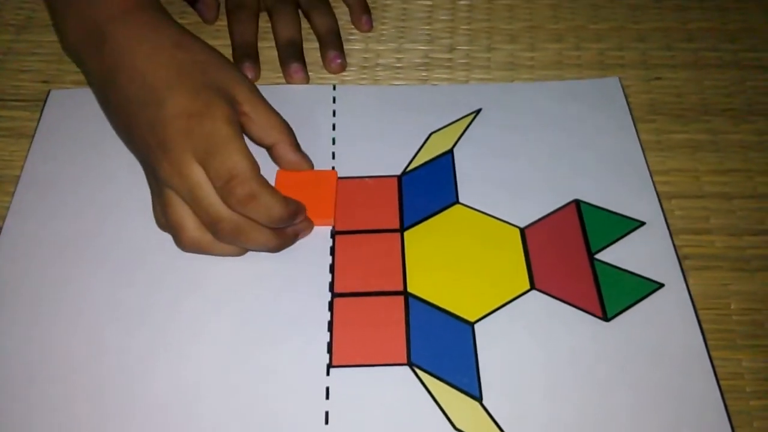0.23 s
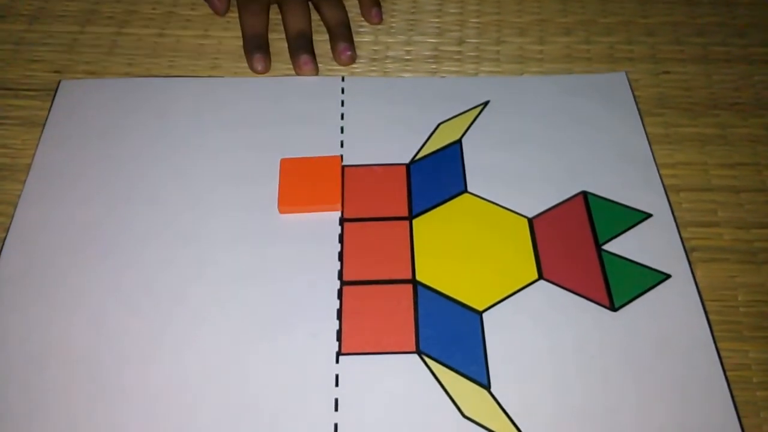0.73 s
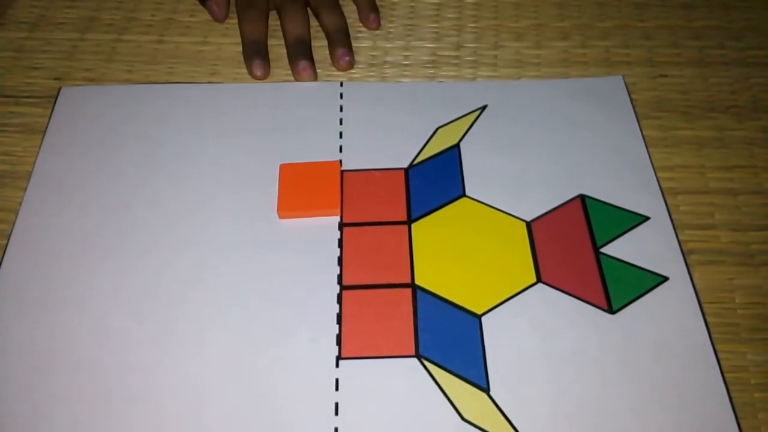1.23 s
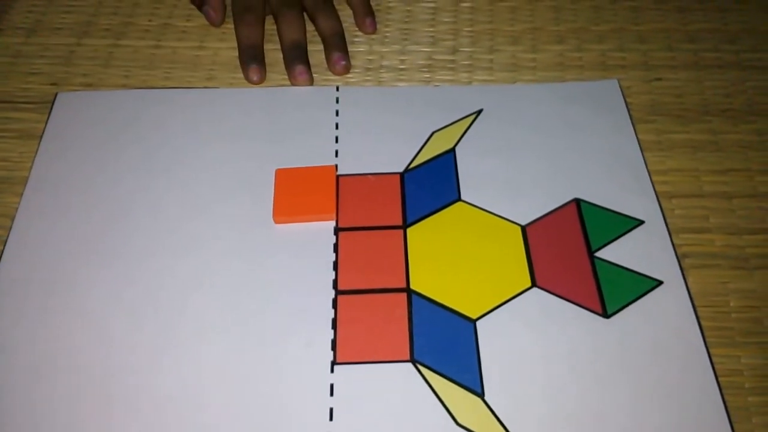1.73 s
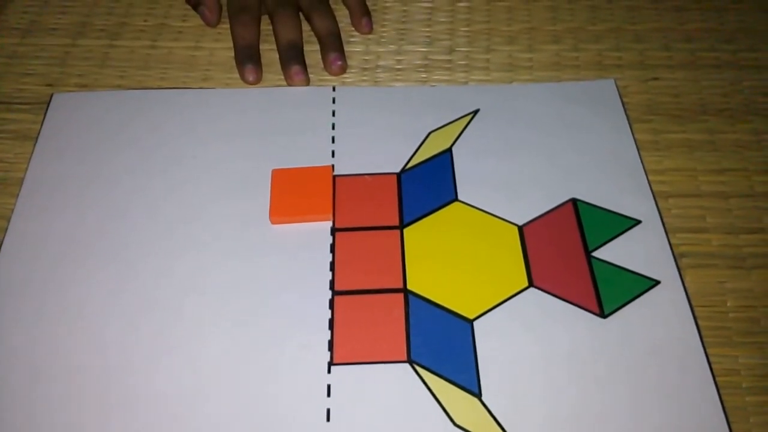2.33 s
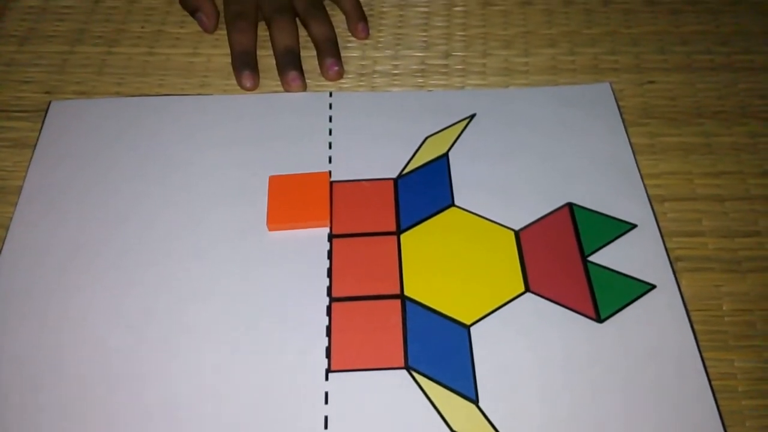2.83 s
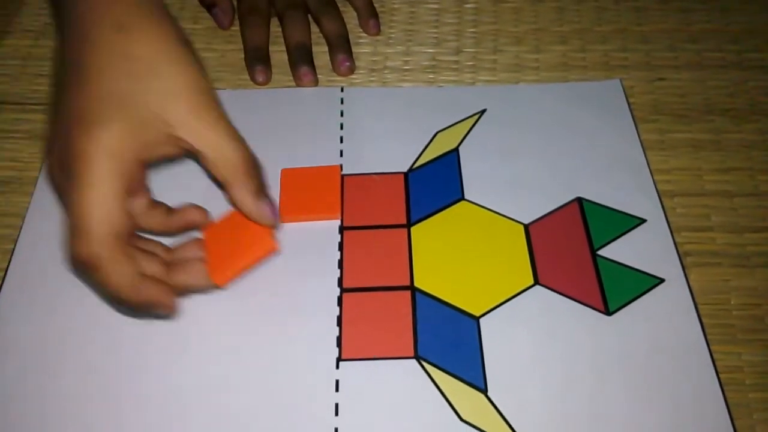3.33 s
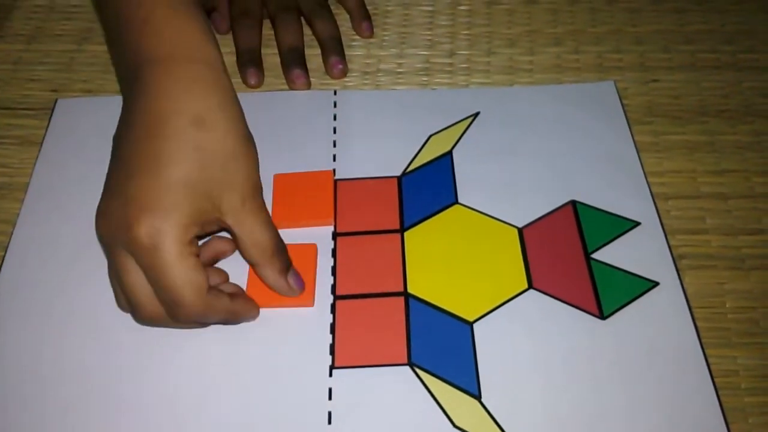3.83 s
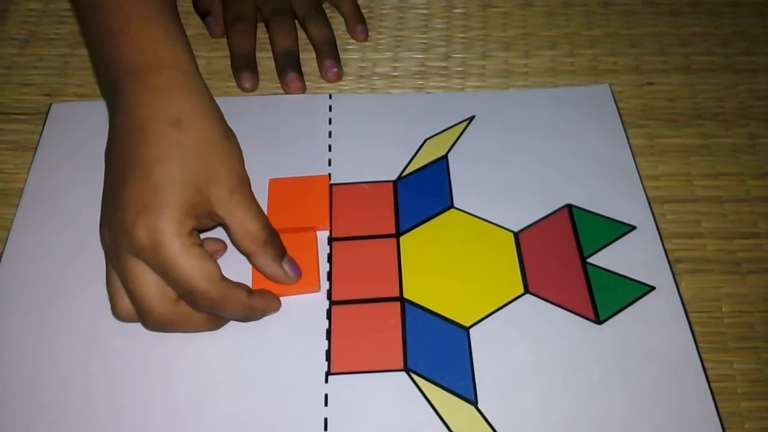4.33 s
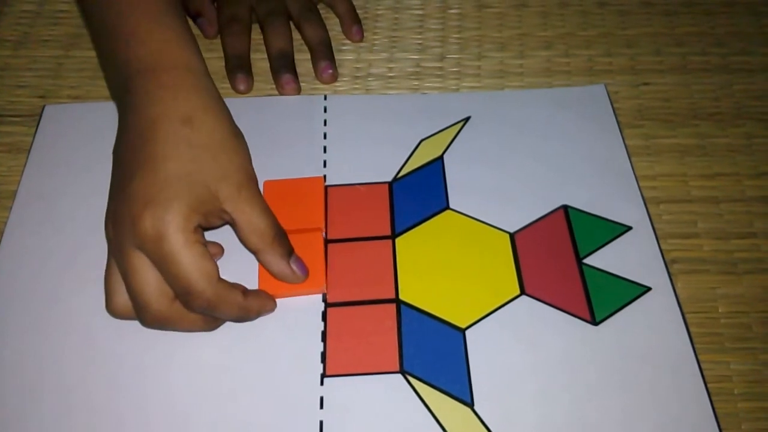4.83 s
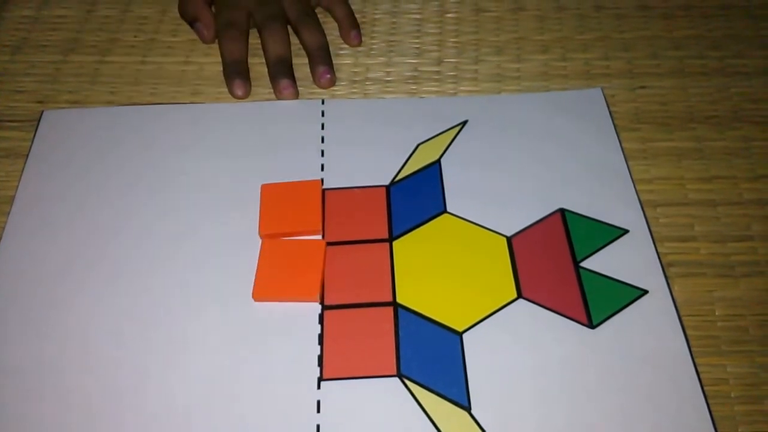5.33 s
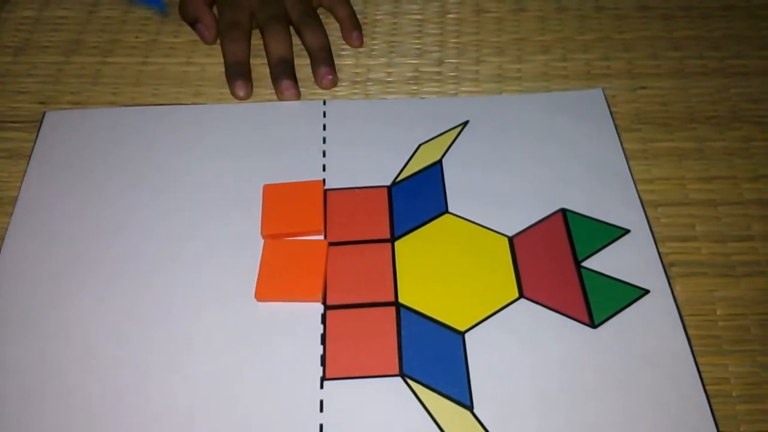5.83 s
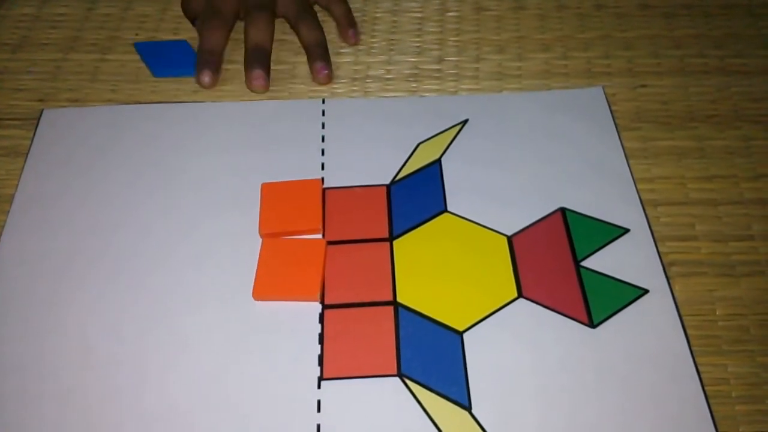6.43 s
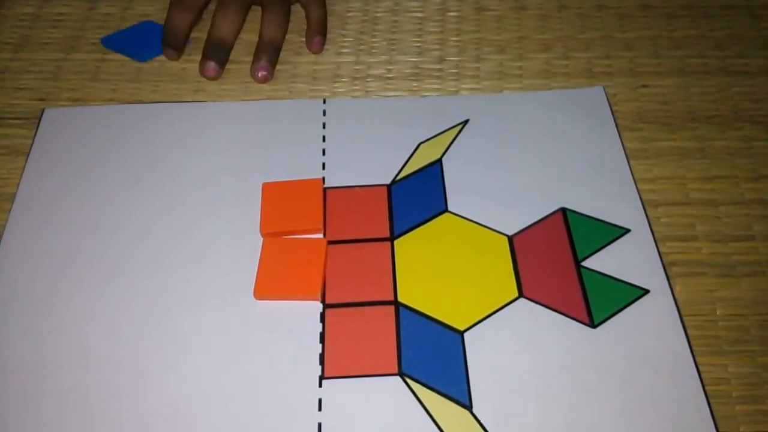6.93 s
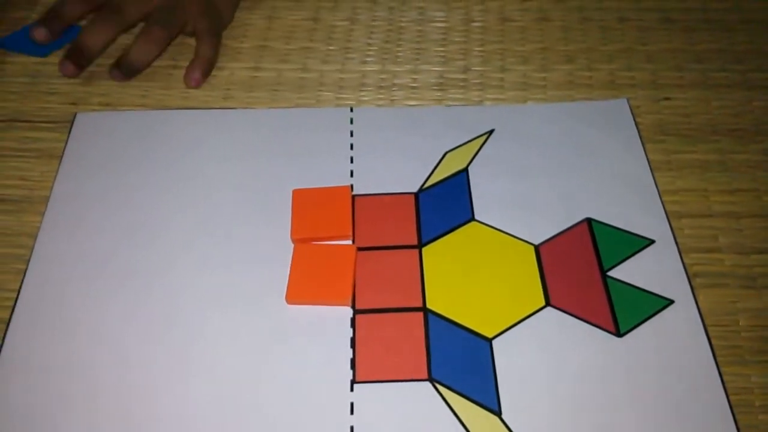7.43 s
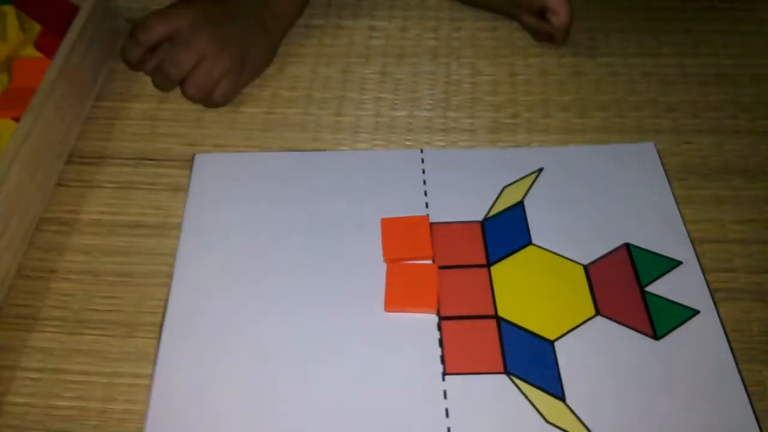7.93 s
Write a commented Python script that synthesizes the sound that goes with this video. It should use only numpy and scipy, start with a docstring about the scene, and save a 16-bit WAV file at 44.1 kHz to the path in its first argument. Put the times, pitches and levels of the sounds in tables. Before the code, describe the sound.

After a nearly silent start with a dull far-off thud, wooden blocks clack, rattle and scrape inside a box for about two seconds. A hush follows, with only low rumble, small taps of one block on a laminated sheet and barely audible nudging. Then a second rummage starts with a very hard clack and continues in irregular rattles. Close pickup, short hard room reflections, faint hiss.

```python
"""Wooden blocks in a box

A child rummages in a wooden box of small flat blocks, sets one down on a laminated sheet, slides it
into place and rummages again. Contacts are decaying sines plus filtered noise bursts; scrapes are
random slips turned into filtered rattle. Noise tails give the small bare room. From far away come a
dull thud (filtered noise) and a faint whine (wavering sines), over low rumble and hiss."""
import sys
import numpy as np
from scipy import signal
from scipy.fft import rfft, irfft, next_fast_len
from scipy.io import wavfile
from scipy.ndimage import uniform_filter1d, map_coordinates

SR = 44100
rng = np.random.default_rng(int(sys.argv[2]) if len(sys.argv) > 2 else 0)


def dump(signal):
    """Clip the signal to [-1, 1] and save it as 16-bit WAV at the path in sys.argv[1]."""
    limited = np.clip(np.atleast_2d(signal).T, -1, 1)
    pcm = np.round(limited * 32767).astype(np.int16)
    wavfile.write(sys.argv[1], SR, pcm)


N = 360738
HIT_SAMPLES = 1536  # length of one hit

# outstanding blows, levels before trims, rms over 5 ms:
# [t/s, box knock/dB, block click/dB, block pitch f/Hz, edge snap/dB]
BLOWS = [(0.8491, -24.5, -9.5, 6615, -25.5), (0.8529, -13, -17.5, 2893, -36),
         (0.8613, -20.5, -11, 3601, -27.5), (.928, -23, -22.5, 2678, -31), (1.061, -34, -22.5, 4100, -40.5),
         (1.0716, -23, -13, 4420, -33.5), (1.0932, -21, -15, 5070, -31), (1.1772, -29.5, -37.5, 2915, -54),
         (1.2443, -26, -26.5, 4237, -56), (1.2611, -23.5, -31, 5080, -40), (1.351, -30.5, -17, 2950, -32.5),
         (1.4097, -30.5, -20, 5560, -40), (1.4482, -21.5, -15.5, 4765, -38),
         (1.4614, -24, -19, 6650, -31.5), (1.5192, -23.5, -14.5, 5220, -44),
         (1.5539, -30.5, -20, 3464, -34.5), (1.5798, -28.5, -24, 4800, -50),
         (1.6327, -27.5, -11, 5555, -29), (1.6473, -27.5, -22, 4560, -29.5),
         (1.8997, -43.5, -28, 6550, -36), (1.9236, -34, -24.5, 3560, -44.5),
         (1.9753, -43, -30, 2990, -53.5), (2.0865, -39, -30, 6400, -39.5),
         (2.1063, -37.5, -35, 5060, -54.5), (2.251, -21.5, -22.5, 2850, -41.5),
         (2.2962, -26, -32.5, 4350, -54), (2.3662, -29.5, -27.5, 7030, -33),
         (2.4014, -29, -25, 6400, -38.5), (2.5138, -27.5, -36.5, 2370, -63),
         (2.5745, -33, -31.5, 2920, -49), (2.8264, -39.5, -35.5, 3630, -77),
         (2.9531, -27.5, -28, 6550, -48), (5.404, -22, -26.5, 5170, -57.5),
         (5.4183, -33.5, -20, 6380, -27.5), (5.4219, -17.5, -37.5, 3640, -38),
         (5.4346, -30.5, -20.5, 5550, -33.5), (5.4651, -28, -25.5, 4170, -32.5),
         (5.5094, -16, -23, 2328, -54.5), (5.5365, -12, -10.5, 2776, -25.5), (5.5413, -10, -6, 2780, -24.5),
         (5.5594, -27, -11, 4060, -25), (5.5856, -17, -22.5, 5300, -36), (5.5988, -21.5, -18, 2560, -40.5),
         (5.6123, -28, -19.5, 3430, -33.5), (5.6243, -18, -30, 2290, -33), (5.729, -21.5, -21, 4770, -35.5),
         (5.752, -24, -23, 2934, -31), (5.7847, -22, -13.5, 6660, -22.5), (5.9663, -36.5, -49.5, 2970, -71),
         (5.9898, -27.5, -35, 4960, -41), (6.0491, -35.5, -49, 2820, -60),
         (6.1068, -28.5, -25.5, 6900, -46), (6.1304, -26, -23, 4630, -41), (6.211, -21, -16.5, 6290, -32),
         (6.3108, -24.5, -12.5, 6430, -23), (6.3646, -24, -19, 2835, -39),
         (6.3869, -22.5, -11, 5140, -30.5), (6.4362, -25, -18.5, 3944, -44),
         (6.4791, -50.5, -22.5, 7130, -39), (6.5261, -32, -24, 4920, -47.5),
         (6.5537, -26, -20.5, 6570, -34.5), (6.6351, -47, -32.5, 4440, -67),
         (6.6562, -29.5, -26.5, 4810, -39.5), (6.7398, -31, -45, 3010, -74),
         (7.035, -33.5, -32, 4630, -51.5), (7.1281, -28, -14, 4680, -23.5), (7.1456, -23, -21, 5300, -37.5),
         (7.1806, -32.5, -16, 5190, -31), (7.3701, -31.5, -28.5, 4845, -57),
         (7.4082, -34.5, -26, 3570, -45.5), (7.4532, -30, -26, 3470, -53), (7.4758, -26, -21, 3703, -48),
         (7.5952, -28, -33, 3200, -67), (7.631, -45.5, -31.5, 3880, -52), (7.6596, -26.5, -23.5, 5110, -70),
         (7.7866, -29, -28.5, 2920, -47), (7.8059, -20.5, -21, 2840, -35), (7.8171, -23, -32, 5020, -38.5),
         (7.8665, -34, -35.5, 6170, -49), (7.9289, -20.5, -18.5, 3500, -43.5)]
# pushes of blocks over the box bottom: [middle t/s, half length/s, level/dB before trims]
PUSHES = [(.95, .04, -34), (1.066, 0.03, -30.5), (1.23, .04, -42.5), (1.409, 0.049, -31), (1.6, .05, -37.5),
          (1.733, 0.025, -39), (1.921, .025, -35.5), (2.101, .03, -46), (2.387, .08, -36.5),
          (2.691, 0.016, -46), (2.762, .02, -58.5), (2.862, 0.044, -48.5), (5.47, .035, -33.5),
          (5.76, 0.066, -31), (6.091, 0.11, -39), (6.418, .11, -37.5), (6.7, .07, -47), (6.921, .11, -52),
          (7.17, .029, -37), (7.458, .095, -35), (7.83, .03, -41.5), (8.137, 0.039, -56)]
# relative spectrum of knocks on the box: [f/Hz, density/dB per Hz]
KNOCK_SPECTRUM = [(60, -28), (350, -24.5), (600, -14.5), (860, -8), (1120, -0.5), (2400, 3), (3200, -6),
                  (6000, -41.5)]
# relative spectrum of scrape hiss and grazing clicks: [f/Hz, density/dB per Hz]
HISS_SPECTRUM = [(1000, -22.5), (2700, 8), (4000, -1.5), (6700, -2.5), (7700, -15.5), (11000, -25),
                 (15500, -31.5)]
# relative spectrum of a tap on the sheet or between blocks: [f/Hz, density/dB per Hz]
TAP_SPECTRUM = [(200, -24), (1100, -20), (1700, 0), (2300, -0.5), (3400, -6), (6700, -13), (7800, -25),
                (14000, -45.5)]


def amp(db):
    """Decibels to gain."""
    return np.exp(np.asarray(db) * (np.log(10) / 20))


def unit(x):
    """Scale to rms 1."""
    return x / np.sqrt(np.mean(x ** 2) + 1e-20)


def along(points, hz):
    """Interpolate (f/Hz, value) points on a log frequency axis."""
    f, v = np.transpose(points)
    return np.interp(np.log(hz + 1), np.log(f), v)


def gains(rows):
    """One gain curve per dB column of (t/s, dB...) rows; -140 dB outside."""
    s, *columns = np.transpose(rows)
    t = np.arange(N) / SR
    return [amp(np.interp(t, s, db, left=-140, right=-140)) for db in columns]


def wobble(rate_hz):
    """Smooth random curve through normal knots at rate_hz."""
    knots = rng.standard_normal(int(N * rate_hz / SR) + 4)
    coarse = np.arange(0, N, 32)
    return np.interp(np.arange(N), coarse, map_coordinates(knots, [coarse * rate_hz / SR]))


def colour(x, points):
    """Minimum-phase filter with the given spectrum, via the folded cepstrum."""
    size = 2 * next_fast_len(x.shape[-1] // 2 + HIT_SAMPLES)
    cepstrum = irfft(np.log(amp(along(points, np.fft.rfftfreq(size, 1 / SR)))))
    cepstrum[1:size // 2] *= 2
    cepstrum[size // 2 + 1:] = 0
    response = np.exp(rfft(cepstrum))
    return irfft(rfft(x, size) * response)[..., :x.shape[-1]]


def fade(t, t60):
    """Exponential decay, -60 dB at t60."""
    return np.exp(-np.minimum(np.log(1000) * t / t60, 60))


def level(hits):
    """Scale each row to the energy of 5 ms at rms 1."""
    return hits * np.sqrt(0.005 * SR / (np.sum(hits ** 2, axis=-1, keepdims=True) + 1e-20))


def place(times, hits):
    """Add each row into the time line at its time."""
    index = np.round(times * SR).astype(int) + np.arange(hits.shape[1])
    return np.bincount(index.ravel(), hits.ravel(), N)[:N]


def bursts(count, t60, spectrum):
    """Short decaying noise cracks, one a row."""
    noise = rng.standard_normal((count, HIT_SAMPLES))
    return level(colour(noise * fade(np.arange(HIT_SAMPLES) / SR, t60), spectrum))


def scuff(count, spectrum, rise_s=0.0016):
    """Brief graze just before a blow: noise swelling exponentially, one a row."""
    t = np.arange(HIT_SAMPLES) / SR
    noise = rng.standard_normal((count, HIT_SAMPLES))
    return level(colour(noise * np.exp((t - t[-1]) / rise_s), spectrum))


def patchy(x, depth_db):
    """Let narrow bands of a noise swell and sink on their own."""
    z = signal.stft(x, nperseg=2048)[2]
    field = rng.standard_normal(z.shape[-2:])
    field = uniform_filter1d(field, size=3, axis=0)
    field = uniform_filter1d(field, size=8, axis=1)
    return signal.istft(z * amp(depth_db * unit(field)), nperseg=2048)[1][..., :N]


def strokes(rows):
    """Gain curve of (middle/s, half length/s, dB) strokes: bells with power 1/e at the half length."""
    middle, half, db = np.transpose(rows)[:, :, None]
    t = np.arange(0, N, 32) / SR
    power = amp(db) ** 2 * np.exp(-np.minimum(((t - middle) / half) ** 2, 60))
    return np.interp(np.arange(N) / SR, t, np.sqrt(power.sum(axis=0)))


def friction(rate_hz, spread_db, smooth_db):
    """Tiny slips of uneven size over a smooth rubbing noise, rms 1."""
    happens = rng.random(N) < rate_hz / SR
    sign = rng.choice([-1, 1], N)
    slips = happens * sign * amp(spread_db * np.clip(rng.standard_normal(N), -2, 2))
    return unit(unit(slips) + amp(smooth_db) * rng.standard_normal(N))


def background(deep_db=-2, upper_db=-2, air_db=-73, side_db=-15):
    """Wandering low rumble of the surroundings and faint hiss: patchy noise, slightly wide."""
    # rumble before trims: [t/s, deep level/dB, upper level/dB]
    rumble_rows = [(0, -59, -64), (.8, -55, -58), (1.8, -49, -58.5), (2.2, -55.5, -64.5), (3.7, -61, -61.5),
                   (4.2, -65, -66), (5.4, -58, -60), (6.5, -60, -65.5), (6.9, -59, -57), (8.18, -65, -65.5)]
    # relative spectra: [f/Hz, density/dB per Hz]
    deep_spectrum = [(20, -29), (48, -10.5), (68, 1), (90, -7.5), (128, 3), (160, -13), (300, -26.5),
                     (900, -67.5)]
    upper_spectrum = [(100, -25.5), (170, -5.5), (210, -1), (290, -10.5), (400, -18), (700, -18),
                      (2000, -62.5)]
    air_spectrum = [(30, -9), (500, -11), (1000, 5.5), (2000, 0), (4000, -3.5), (6500, -7.5), (7800, -17.5),
                    (15000, -26)]

    def noise(spectrum):
        """Two channels of patchy coloured noise, rms 1."""
        return unit(colour(patchy(rng.standard_normal((2, N)), depth_db=4), spectrum))

    deep_gain, upper_gain = gains(rumble_rows)
    deep = amp(deep_db) * deep_gain * noise(deep_spectrum)
    upper = amp(upper_db) * upper_gain * noise(upper_spectrum)
    mid, side = deep + upper + amp(air_db) * noise(air_spectrum)
    return mid + amp(side_db) * np.array([side, -side])


def far_whine(waver_hz=20, flutter_db=2):
    """Faint, unsteady high whine: sines wavering in pitch and level."""
    # course: [t/s, level/dB]
    whine_rows = [(4.4, -91), (4.53, -71), (4.8, -70.5), (4.9, -73), (5.06, -76), (5.15, -96.5)]
    # tones: [mean f/Hz, relative level/dB]
    whine_tones = [(2865, -6), (3245, 0.5), (3595, -7)]
    tones = 0
    for hz, db in whine_tones:
        gain = amp(db + flutter_db * wobble(31))
        phase = 2 * np.pi * np.cumsum(hz + waver_hz * wobble(90)) / SR
        tones = tones + gain * np.sin(phase)
    return gains(whine_rows)[0] * unit(tones)


def far_thud(start_s=0.218, thud_db=-46, thud_t60=0.62, boom_db=-45, boom_t60=1.2):
    """Something heavy and dull shuts far away; a deep boom swells more slowly with it."""
    t = np.maximum(np.arange(N) / SR - start_s, 0)
    thud_spectrum = [(40, -22), (140, -8), (280, -0.5), (420, -19), (900, -37), (3000, -74)]
    boom_spectrum = [(20, -22.5), (70, -3), (110, -3.5), (200, -20.5), (900, -71)]
    thud = amp(thud_db) * unit(colour(rng.standard_normal(N), thud_spectrum))
    boom = amp(boom_db) * unit(colour(rng.standard_normal(N), boom_spectrum))
    thud = thud * (1 - fade(t, 0.018)) * fade(t, thud_t60)
    return thud + boom * (1 - fade(t, 0.21)) * fade(t, boom_t60)


def room(x, build_s=0.008, count=4):
    """Dense wall answer: decaying noise tails, taken in turn nine times a second."""
    # decay: [f/Hz, t60/s]
    room_decay = [(150, 0.13), (600, 0.75), (1500, 0.32), (3500, 0.34), (6500, 0.39), (12000, 0.42)]
    # tone: [f/Hz, gain/dB]
    room_colour = [(100, -8), (1200, -4.5), (3000, -3), (5000, -9.5), (6700, -9.5), (9000, -10),
                   (15000, -12.5)]
    hz, t, z = signal.stft(rng.standard_normal((count, SR // 2)), SR, nperseg=256)
    tails = signal.istft(z * fade(t, along(room_decay, hz)[:, None]), SR, nperseg=256)[1]
    tails = tails * np.clip(np.arange(tails.shape[1]) / SR / build_s, 0, 1)
    tails = tails / np.linalg.norm(tails, axis=1, keepdims=True)
    turn = np.arange(N) * 9 // SR % count
    parts = x * (turn == np.arange(count)[:, None])
    return colour(signal.fftconvolve(parts, tails, axes=1).sum(axis=0)[:N], room_colour)


def fingertip():
    """Skin sticks and slips on the block's smooth face and rings a few narrow bands."""
    # slip off the block: [middle t/s, half length/s, level/dB]
    squeak_rows = [(4.975, 0.031, -63.5)]
    # resonances: [f/Hz, width/Hz, relative level/dB]
    squeak_modes = [(1160, 82, -3), (1767, 52, 5.5), (2200, 180, -8), (4260, 83, -9)]
    size = next_fast_len(N)
    hz = np.fft.rfftfreq(size, 1 / SR)
    bands = 0
    for centre, width, db in squeak_modes:
        damping = 1j * hz * width
        bands = bands + amp(db) * damping / (centre ** 2 - hz ** 2 + damping)
    slips = friction(rate_hz=610, spread_db=6, smooth_db=-1.5)
    return strokes(squeak_rows) * unit(irfft(rfft(slips, size) * bands, size)[:N])


def sheet(catch_db=3):
    """A block lands with dead noise taps and is nudged, with uneven friction, over the smooth sheet."""
    # landings: [t/s, level/dB over 5 ms]
    tap_rows = [(3.475, -33), (3.484, -40), (3.4974, -37), (3.5074, -32), (3.8021, -37.5)]
    # strokes of finger and block: [middle t/s, half length/s, level/dB before catching]
    rub_rows = [(0.444, 0.043, -62), (0.538, 0.012, -60.5), (3.73, 0.017, -53), (3.92, 0.081, -65),
                (4.13, 0.0642, -70), (5.0, 0.063, -70)]
    # relative rub spectrum: [f/Hz, density/dB per Hz]
    rub_spectrum = [(500, -23), (1400, -8), (2600, 6), (6200, -1), (7800, -11.5), (15000, -29)]
    s, db = np.transpose(tap_rows)[:, :, None]
    taps = place(s, amp(db) * bursts(len(s), 0.0099, TAP_SPECTRUM))
    slips = friction(rate_hz=2000, spread_db=1.5, smooth_db=-9.5)
    rub = unit(colour(patchy(slips, depth_db=2.5), rub_spectrum))
    return taps + amp(catch_db * wobble(45)) * strokes(rub_rows) * rub


def shifting():
    """The box drags dully over the mat for a moment: low-coloured friction."""
    # drag: [middle t/s, half length/s, level/dB]
    shift_rows = [(1.62, .05, -47)]
    drag = [(60, -22), (140, -1.5), (310, 4), (400, -15), (900, -22), (3000, -66.5)]
    slips = friction(rate_hz=120, spread_db=2.5, smooth_db=7)
    return strokes(shift_rows) * unit(colour(slips, drag))


def bumps(bump_db=-3):
    """Some blows come with a dull thump of the box on the mat, stronger or weaker: noise bursts."""
    # thumps: [t/s, level/dB before trim]
    bump_rows = [(0.849, -35.5), (1.094, -36.5), (1.261, -40.5), (1.445, -41), (1.462, -29), (1.632, -45),
                 (2.253, -38), (5.418, -28), (5.539, -44.5), (5.786, -33.5), (6.386, -38)]
    s, db = np.transpose(bump_rows)[:, :, None]
    thump = [(15, -48), (50, -16.5), (120, -6.5), (600, 12.5), (1100, -10), (4000, -54)]
    return place(s, amp(db + bump_db) * bursts(len(s), 0.02, thump))


def jostle(rate_hz=60, spread_db=5.5, t60=0.0068, centre_hz=2600, octaves=0.68):
    """Countless small ticks of neighbouring blocks, each with its own pitch and size; rms 1."""
    count = int(rate_hz * N / SR)
    when, size, pitch = np.transpose(rng.random((count, 3)))[:, :, None] * 2 - 1  # each -1..1
    t = np.arange(HIT_SAMPLES) / SR
    pitch_hz = centre_hz * 2 ** (2 * octaves * pitch)
    ring = level(np.sin(2 * np.pi * pitch_hz * t) * (fade(t, t60) - fade(t, t60 / 4)))
    ticks = amp(2 * spread_db * size) * (ring + bursts(count, t60, TAP_SPECTRUM))
    return unit(place((when + 1) / 2 * (N - 1) / SR, ticks))


def sliding(board_db=-2, hiss_db=-2, judder_db=3.5, jostle_db=-5.5):
    """Blocks pushed by the hand scrape over the box bottom and jostle their neighbours."""
    slips = friction(rate_hz=280, spread_db=5, smooth_db=0) * amp(judder_db * wobble(70))
    # each slip is a tiny rough rattle that dies within milliseconds
    t = np.arange(HIT_SAMPLES) / SR
    power = np.abs(signal.fftconvolve(slips ** 2, fade(t, 0.0017))[:N])
    rattle = np.sqrt(power) * rng.standard_normal(N)
    board = amp(board_db) * unit(colour(rattle, KNOCK_SPECTRUM))
    hiss = amp(hiss_db) * unit(colour(rattle, HISS_SPECTRUM))
    return strokes(PUSHES) * (board + hiss + amp(jostle_db) * jostle())


def loose_blocks(count=56, knock_db=-1, click_db=4, snap_db=-14, scatter_db=1.5):
    """Pushes tip loose blocks at random: a longer push gives more contacts, a harder one louder."""
    pushes = np.array(PUSHES)
    share = np.cumsum(pushes[:, 1]) / np.sum(pushes[:, 1])
    middle, half, db = pushes[np.searchsorted(share, (np.arange(count) + 0.5) / count)].T
    when, size = rng.random((count, 2)).T
    knock, click = db + scatter_db * rng.standard_normal((count, 2)).T
    low_hz, high_hz = 2760, 7240  # pitch range of the blocks
    pitch_hz = low_hz * (high_hz / low_hz) ** size
    s = middle + half * (2 * when - 1)
    return np.column_stack([s, knock + knock_db, click + click_db, pitch_hz, click + snap_db])


def side_touches(offset_s, loss_db, count, scatter_db=3):
    """Softer touch of the same block beside each of the heaviest blows, at random gap and strength."""
    blows = np.array(BLOWS)
    heaviest = np.sort(np.argsort(blows[:, 1] + blows[:, 2])[-count:])
    s, knock, click, pitch_hz, snap = blows[heaviest].T
    gap, strength = rng.standard_normal((count, 2)).T
    loss = loss_db + scatter_db * strength
    s = s + offset_s * np.exp(gap / 2)
    return np.column_stack([s, knock - loss, click - loss, pitch_hz, snap - loss])


def all_contacts():
    """Blows, corners landing before the block's face, rebounds as it rocks back, and loose blocks."""
    corners = side_touches(-0.003, loss_db=8, count=15)
    rebounds = side_touches(0.005, loss_db=10.5, count=40)
    return np.vstack([BLOWS, corners, rebounds, loose_blocks()])


def contacts(block_t60=0.0078, snap_db=-1, hard_db=-6, board_ring_db=-2, block_ring_db=-2,
             spread_db=4, detune=0.018, graze_db=-18, diffuse_ring_db=-9):
    """Each contact grazes, snaps at the edge, rings one block briefly and knocks the box boards."""
    # thin boards of the box: [f/Hz before detuning, relative level/dB, t60/s]
    box_modes = [(750, -14, 0.028), (1010, -7, 0.094), (1143, 1, 0.041), (1446, 3.5, 0.022),
                 (1820, 0, 0.013), (1880, -11.5, 0.054), (2310, 6, 0.0067), (2583, -6, 0.002)]
    # relative spectra: [f/Hz, density/dB per Hz]
    click_spectrum = [(600, -43), (2000, -6.5), (2800, -2), (4500, 6), (6700, 2), (7700, -9.5),
                      (12000, -44.5)]
    snap_spectrum = [(3000, -22), (7500, 3.5), (9000, 8), (11000, 2), (13000, -14), (15800, -26)]
    hard_spectrum = [(6000, -26.5), (11500, 4), (15800, -12)]
    s, knock, click, pitch_hz, snap = all_contacts().T[:, :, None]
    count, t = len(s), np.arange(HIT_SAMPLES) / SR

    # where the blow lands sets each mode's strength; the load of blocks detunes it
    chance = rng.standard_normal((count, len(box_modes), 3, 1)).transpose(1, 2, 0, 3)
    boards = 0
    for (hz, db, t60), (strength, sign, load) in zip(box_modes, chance):
        gain = np.sign(sign) * amp(db + spread_db * strength)
        boards = boards + gain * np.sin(2 * np.pi * hz * (1 + detune * load) * t) * fade(t, t60)
    boards = level(colour(boards, [(60, -38), (800, 2)]))  # board ringing is thinned below 800 Hz
    ring = level(np.sin(2 * np.pi * pitch_hz * t) * (fade(t, block_t60) - fade(t, 0.002)))
    knocks = bursts(count, 0.012, KNOCK_SPECTRUM)
    clicks = bursts(count, 0.012, click_spectrum)

    # a harder contact is shorter, so its highest treble grows faster than the rest
    hard = snap + (snap - snap.max()) / 4 + hard_db
    edge = amp(snap + snap_db) * bursts(count, 0.0088, snap_spectrum)
    edge = edge + amp(hard) * bursts(count, 0.0088, hard_spectrum)

    def blow(board_db, ring_db):
        """Box knock, block click and edge snap with the given share of ringing."""
        box = level(amp(board_db) * boards + knocks)
        block = level(amp(ring_db) * ring + clicks)
        return amp(knock) * box + amp(click) * block + edge

    graze = amp(knock) * scuff(count, KNOCK_SPECTRUM) + amp(click) * scuff(count, HISS_SPECTRUM)
    direct = place(s, blow(board_ring_db, block_ring_db))
    direct = direct + place(s - HIT_SAMPLES / SR, amp(graze_db) * graze)
    # over all directions no single mode stands out: the walls receive a broader clack
    return direct, place(s, blow(diffuse_ring_db, diffuse_ring_db))


def scene(box_room_db=-4, sheet_room_db=-12, width_db=-35):
    """Blocks in the box and on the sheet with their room, over the far sounds."""
    direct, diffuse = contacts()
    box = bumps() + sliding() + shifting()
    near = sheet() + fingertip()
    # the sheet lies right under the microphone, so it is drier than the box
    send = amp(box_room_db) * (diffuse + box) + amp(sheet_room_db) * near
    side = amp(width_db) * room(send, count=1)
    blocks = direct + box + near + room(send) + np.array([side, -side])
    return blocks + far_thud() + far_whine() + background()


def record(dry, top_hz=15800):
    """Microphone overload clips at full scale; nothing passes above the band limit."""
    size = next_fast_len(N + HIT_SAMPLES)
    clipped = np.clip(dry, -1, 1)
    passband = np.fft.rfftfreq(size, 1 / SR) < top_hz
    return irfft(rfft(clipped, size) * passband, size)[:, :N]


dry = scene()
out = record(dry)
dump(out)
```